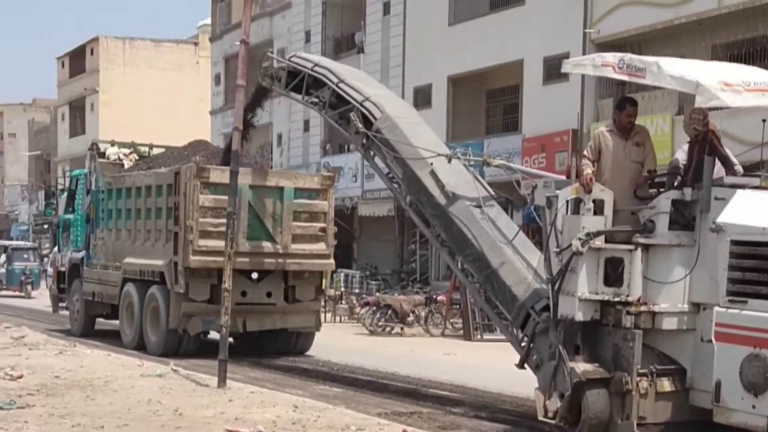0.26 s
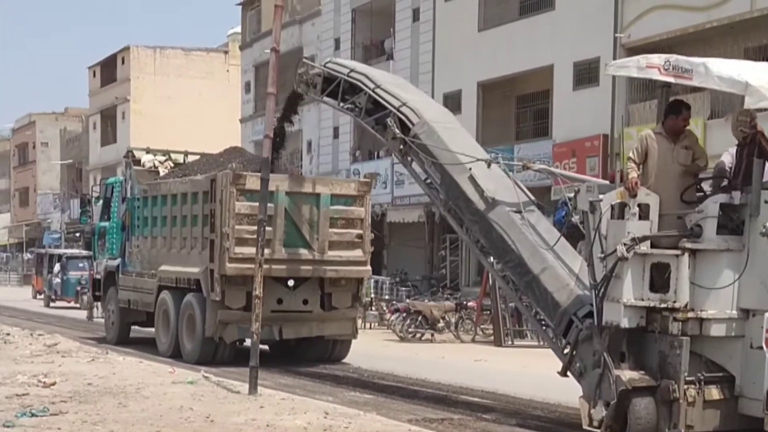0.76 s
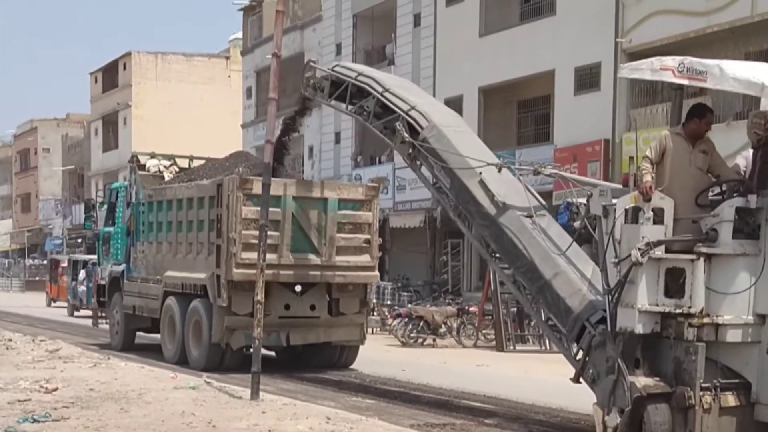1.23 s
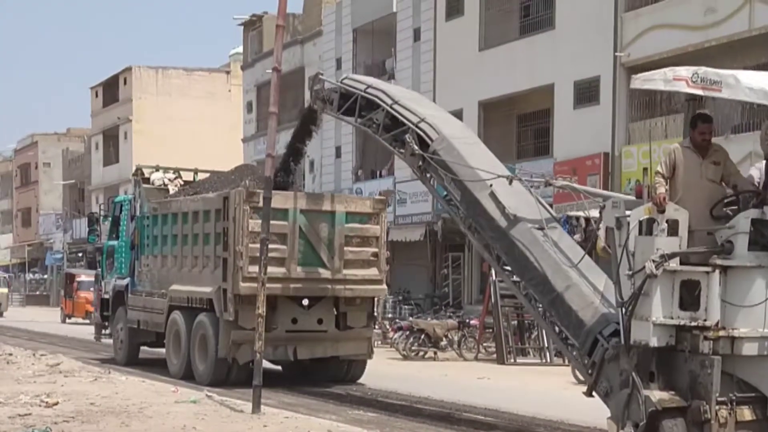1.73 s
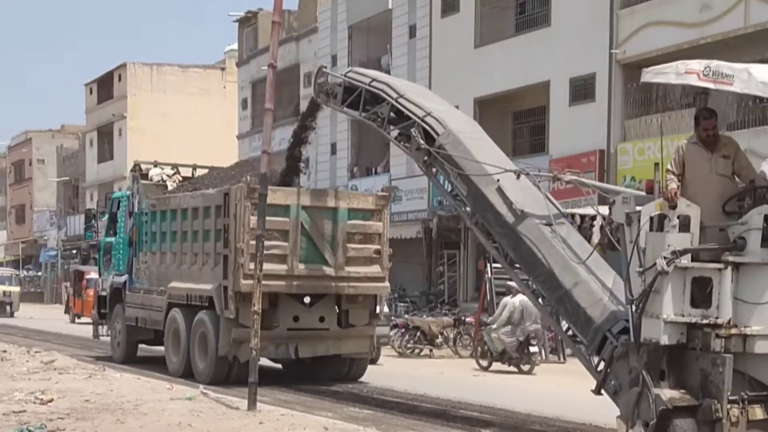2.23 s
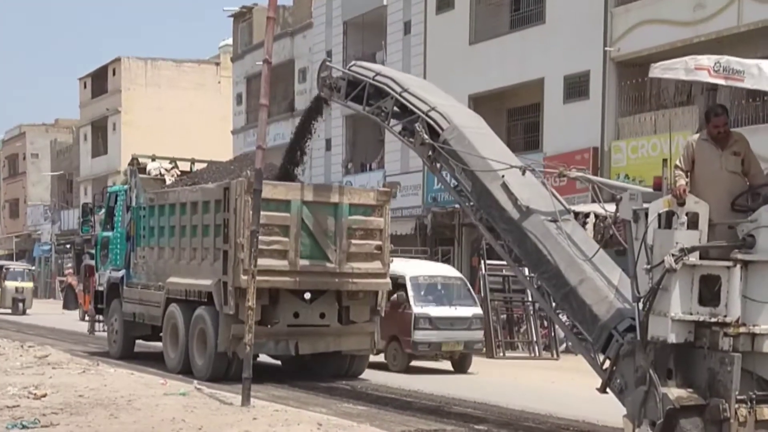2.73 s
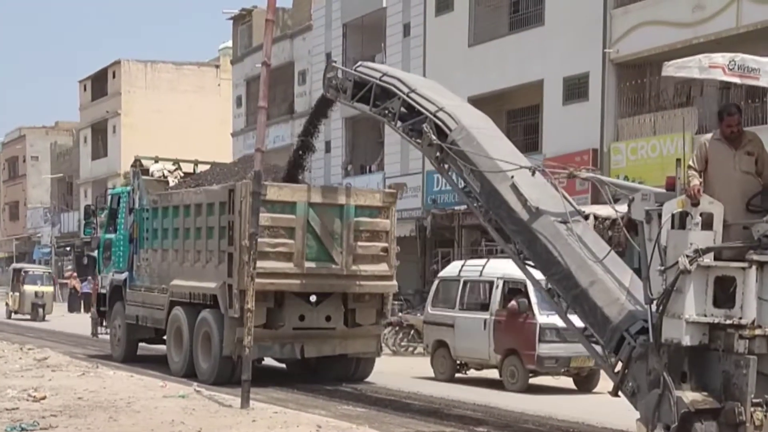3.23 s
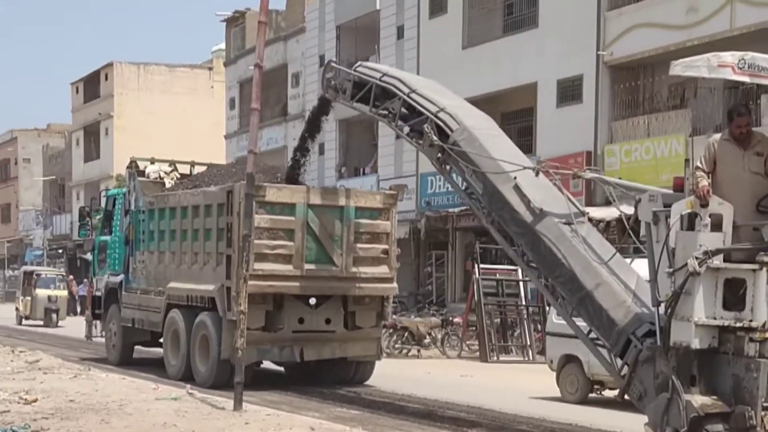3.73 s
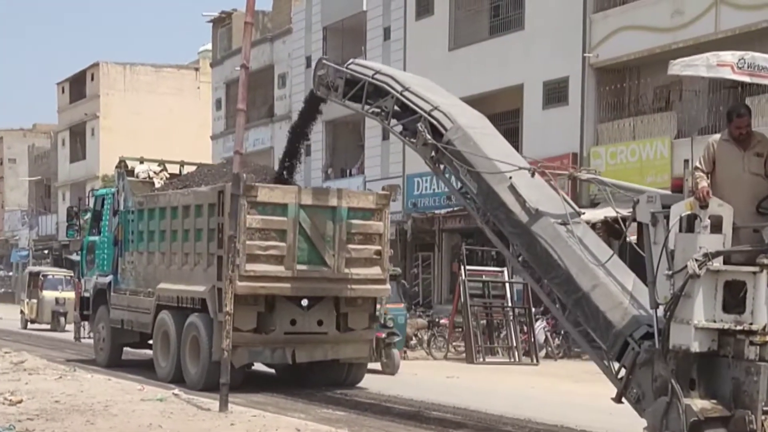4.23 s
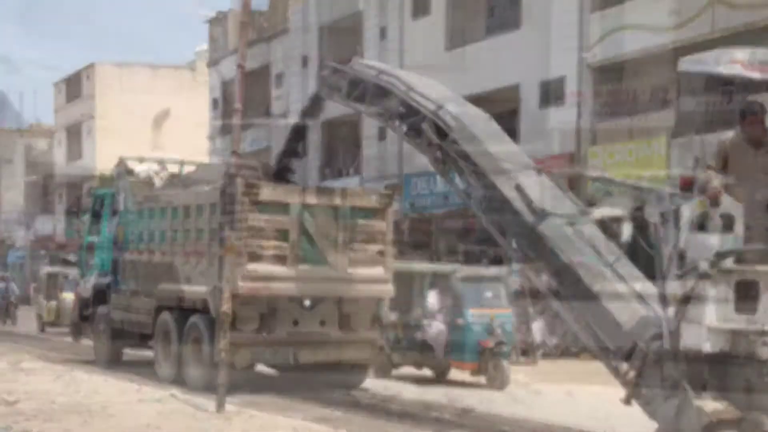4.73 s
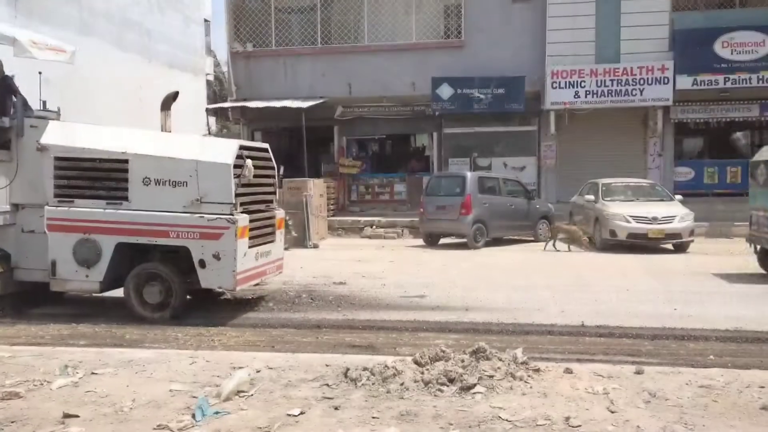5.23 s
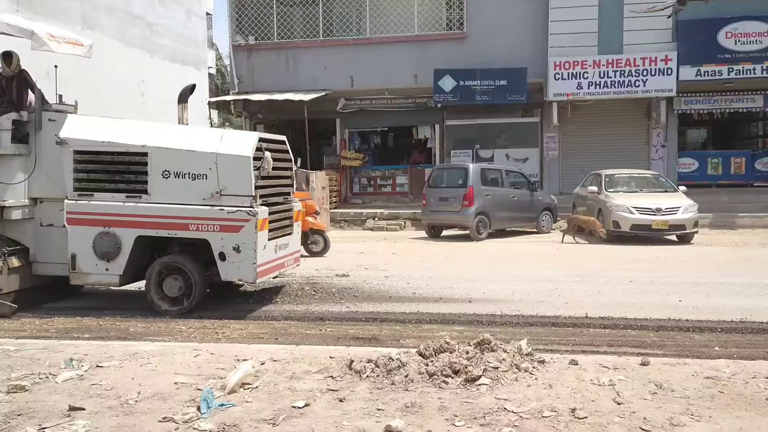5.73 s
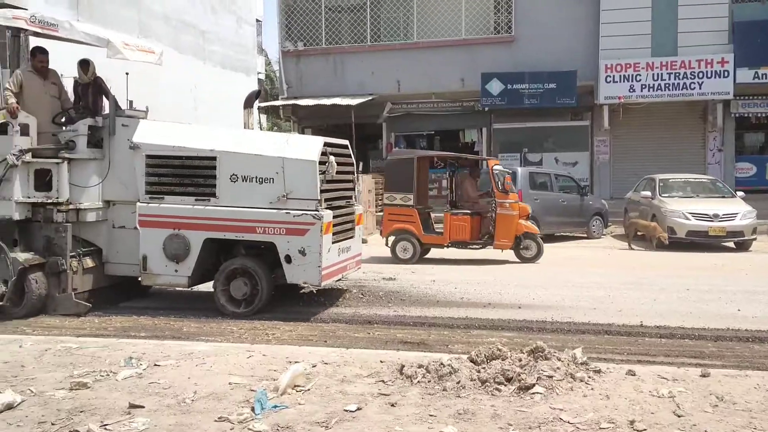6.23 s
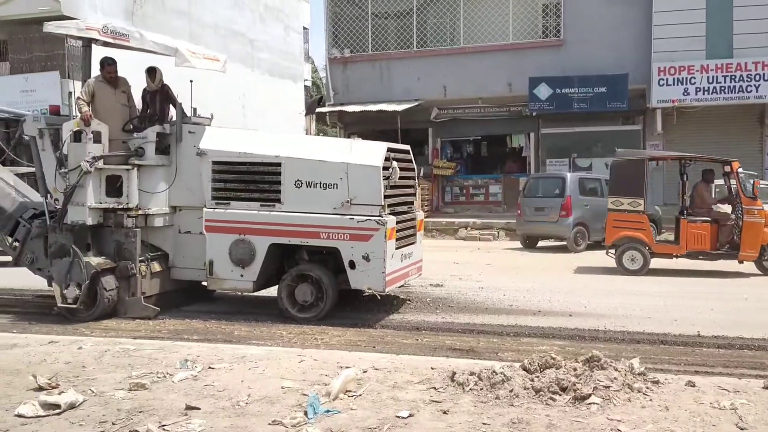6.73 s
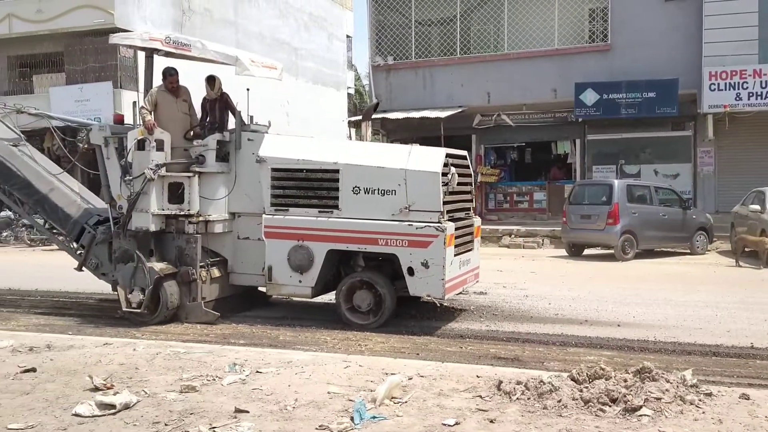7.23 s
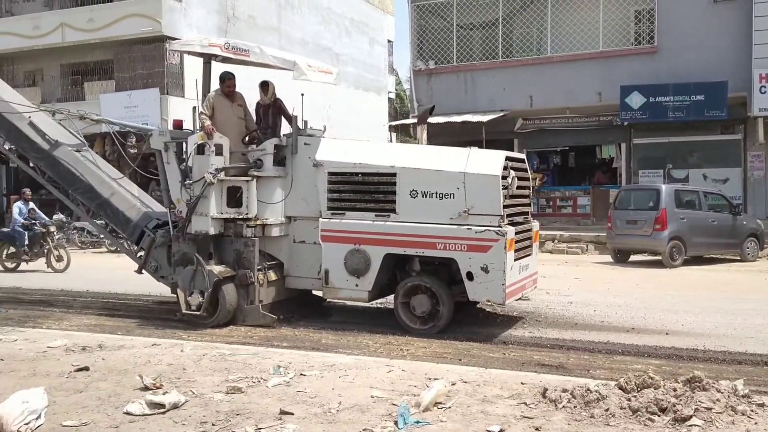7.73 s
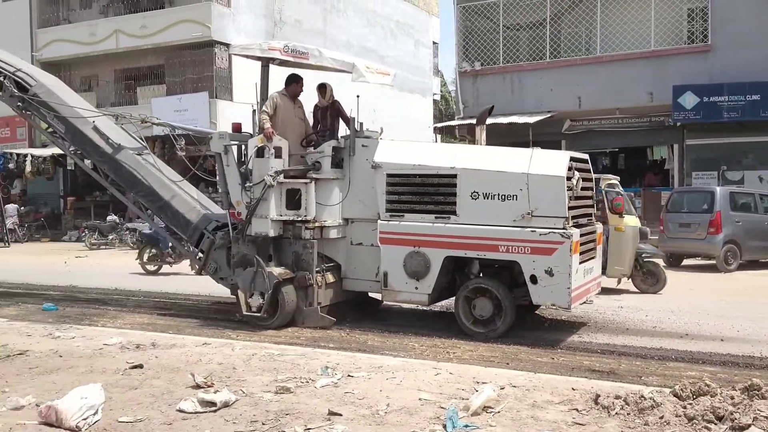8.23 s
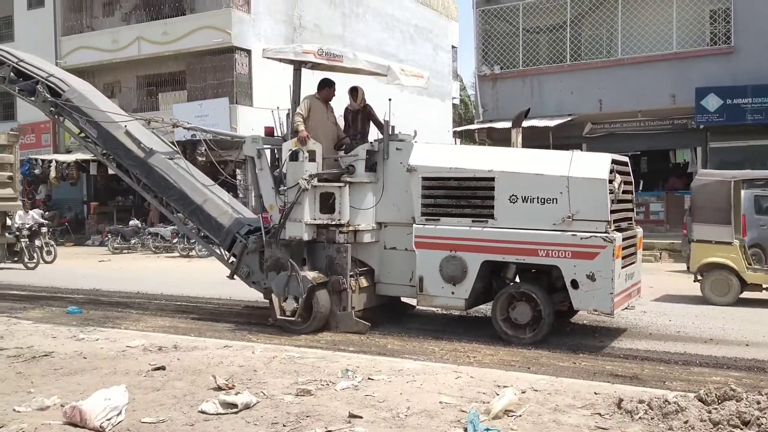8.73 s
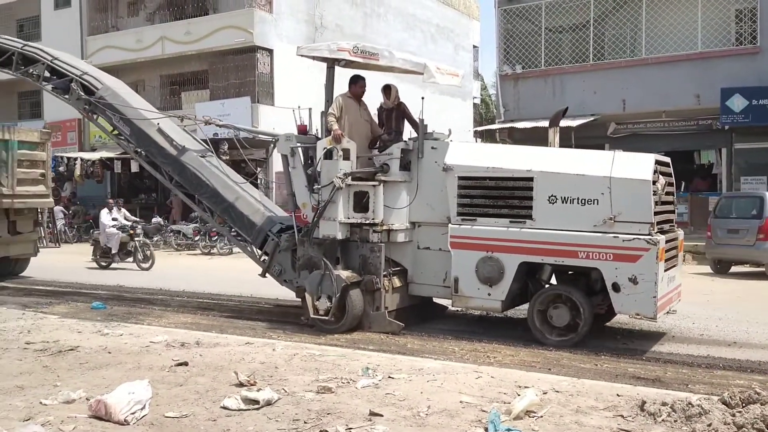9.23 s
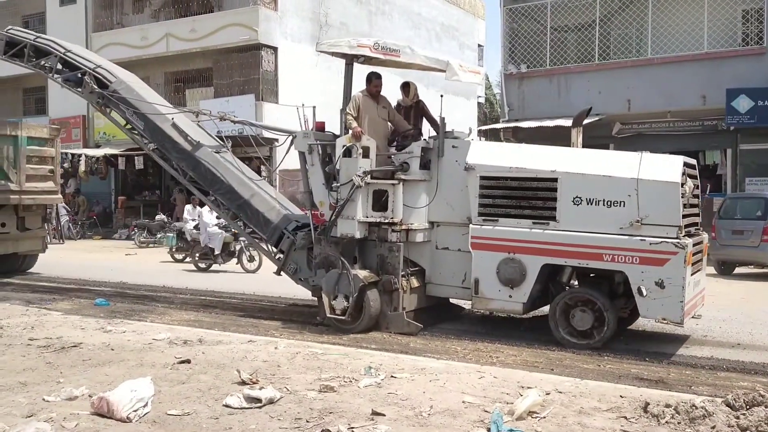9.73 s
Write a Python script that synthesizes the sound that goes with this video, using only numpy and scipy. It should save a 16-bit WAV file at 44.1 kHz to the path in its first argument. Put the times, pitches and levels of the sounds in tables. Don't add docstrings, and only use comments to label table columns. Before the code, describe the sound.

A road milling machine's heavy diesel drones and rumbles along a street, with early air hisses, a louder rushing fan midway and tinkling loose metal.

```python
import sys
import numpy as np
from scipy import signal
from scipy.fft import irfft
from scipy.io import wavfile
from scipy.ndimage import uniform_filter1d

SR = 44100
rng = np.random.default_rng(int(sys.argv[2]) if len(sys.argv) > 2 else 0)


def int16_out(signal):
    q = np.round(np.clip(np.atleast_2d(signal).T, -1, 1) * 32767)
    wavfile.write(sys.argv[1], SR, q.astype(np.int16))


def undo_db(level):
    steps = np.asarray(level, float) / 20
    return 10 ** steps


N = 439677
HOP = 1024
FRAME_S = HOP / SR
HZ = np.arange(1, HOP + 2) * SR / (2 * HOP)
FRAMES = np.arange(N // HOP + 2) * FRAME_S
TIME = np.arange(N) / SR
EDGE_HZ = 13150


def curve(table, t):
    s, *columns = np.transpose(table)
    return [np.interp(t, s, c) for c in columns]


def bumps(rows, t):
    return sum(db * np.exp(-((t - s) / half_s) ** 2) for s, db, half_s in rows)


def smooth(v, k):
    v = uniform_filter1d(uniform_filter1d(v, k), k)
    return v / v.std()


def walk(rate_hz, size, step_s):
    k = max(int(1 / (rate_hz * step_s)), 1)
    return smooth(rng.standard_normal(size), k)


def band(lo_hz, hi_hz, steep):
    return -10 * np.log10((1 + (lo_hz / HZ) ** steep) * (1 + (HZ / hi_hz) ** steep))


# (start [s], end [s])
TO_GRILLE, TO_FLANK = (4.46, 5.09), (6.55, 7.6)


def standpoints(t):
    arrive = np.interp(t, TO_GRILLE, (0, 1))
    leave = np.interp(t, TO_FLANK, (0, 1))
    return 1 - arrive, arrive * (1 - leave), leave


# (time [s], nearness [dB], fan and grit in view [dB])
PASS = [(0, -1, 3.5), (.7, -.5, 1), (1.6, 0.5, 3.5), (2.4, 0, 2.5), (3.05, 1, 3), (4.3, 0.5, -1),
        (4.68, -1.5, -0.5), (4.87, -1, 9.5), (5.1, 4.5, 17), (5.45, 6.5, 19.5), (6.4, 7, 18),
        (6.9, 5, 12.5), (7.2, 2.5, 10), (7.5, 0.5, 5), (8.4, 1, 6), (9.2, 0.5, 8), (9.97, 1.5, 5.5)]


def passing(t):
    return curve(PASS, t)


# (time [s], firing rate [Hz])
SPEED = [(0, 113.4), (1.2, 113), (2.2, 113.6), (2.9, 113), (3.4, 113.9), (4.5, 113), (5.0, 113.2),
         (7.2, 112.9), (7.8, 114.6), (8.4, 112), (8.8, 114), (9.15, 112), (9.97, 114)]


def engine_cycle():
    firing_hz = np.interp(TIME, *np.transpose(SPEED))
    return 2 * np.pi * np.cumsum(firing_hz / 6) / SR


FIRING_DB, FIRING_GAIN = -25.5, 1.12
BITE_S, SLACK_DB = 0.029, -8
# (multiple of cycle rate [1], level under firing at belt [dB], grille [dB], flank [dB])
TONES = [(2, -34, -45, -42), (4, -16, -20, -20), (6.75, -40, -13, -26), (9, -13, -10, -17),
         (10, -28, -22, -18), (11.4, -15, -13, -10), (12, -13, -15, -16), (13, -40, -22, -30),
         (16, -28, -24, -26), (20, -40, -27, -40), (22.8, -23, -28, -24), (29, -44, -27, -40),
         (30, -21, -32, -24), (36, -27, -26, -35), (39, -39, -27, -44), (44, -27, -26, -32),
         (46.4, -27, -23, -26), (50, -29, -37, -34), (59.2, -40, -30, -40), (92.5, -28, -38, -30),
         (88.3, -23, -34, -30)]
# (time [s], change [dB])
BITES = [(.78, 3), (1.3, -5), (1.44, 3), (2.08, -6), (3.64, -2), (3.7, 2), (4.22, -0.5), (4.94, -0.5),
         (7.2, -3), (7.53, 2), (8.47, 2.5), (9.02, -8), (9.64, -4)]
# (multiple [1], time [s], change [dB], half length [s])
SWELLS = [(9, 7.15, 7, .45), (9, 8.3, -6, .45), (9, 9.3, 3, .4), (9, 1, -4, .8), (11.4, 3.1, 5, .3),
          (11.4, 1.2, -6, 1.1), (11.4, 7.8, 3, .4), (12, .6, 3, .6), (12, 1.4, -8, .2), (12, 2.0, 4, .3),
          (12, 2.6, -8, .2), (13, 3.0, 22, .15), (16, 9.5, 18, .12), (22.8, 1.6, 4, .3), (30, 9.45, 7, .45),
          (30, 3.7, 3, .4), (46.4, 7.2, 7, .25), (46.4, 6.2, 4, .2), (44, 9.7, 9, .3), (92.5, 9.8, 12, .3),
          (92.5, 4.7, 6, .2), (9, 5.15, 4, .2), (20, 5.3, 5, .25), (36, 1.6, 5, .4)]
# (time [s], rise [dB], half length [s])
GRIPS = [
    (.05, 16, .12),
    (.45, 17, 0.2),
    (1.2, 0, .2),
    (2.0, 14, 0.23),
    (2.55, 13, 0.13),
    (3.0, 9, 0.092),
    (3.55, 10, .1),
    (3.9, 15, 0.12),
    (7.6, 1, .35),
]


def diesel(cycle):
    shares = standpoints(TIME)
    tone_db = FIRING_DB + FIRING_GAIN * passing(TIME)[0]
    tone_db = tone_db + bumps([(*row, BITE_S) for row in BITES], TIME)
    out = undo_db(0.45 * walk(39, N, 1 / SR)) * np.sin(6 * cycle)
    for k, *dbs in TONES:
        size = np.sqrt(sum(share * undo_db(2 * db) for share, db in zip(shares, dbs)))
        if k == TONES[-1][0]:
            size = size * undo_db(SLACK_DB + bumps(GRIPS, TIME))
        size = size * undo_db(bumps([row[1:] for row in SWELLS if row[0] == k], TIME))
        waver = undo_db(0.74 * walk(7.6, N, 1 / SR))
        out += size * waver * np.sin(k * cycle + 0.92 * walk(2.97, N, 1 / SR))
    out *= np.sqrt(2) * undo_db(tone_db)
    return np.array([out * undo_db(0.97), np.roll(out, shift=5) * undo_db(0.23)])


def ports(colour, shape_db, level_db, lo_hz, hi_hz, share, flicker_db):
    hz, *columns = np.transpose(colour)
    db, pan_db, like, lead = (np.interp(np.log(HZ), np.log(hz), c) for c in columns)
    db = db + shape_db
    db -= 10 * np.log10(np.sum(undo_db(2 * db)[(HZ > lo_hz) & (HZ < hi_hz)]))

    third = 3 * np.log2(HZ)
    flicker = walk(9, (int(third.max()) + 2, len(FRAMES)), FRAME_S)
    flicker = flicker + 0.78 * walk(5, len(FRAMES), FRAME_S)
    low, part = third.astype(int), (third % 1)[:, None]
    flicker = (1 - part) * flicker[low] + part * flicker[low + 1]
    gain = undo_db(db + level_db[:, None] + flicker_db * flicker.T) * np.sqrt(share)[:, None]

    common, left, right = rng.standard_normal((3, *gain.shape, 2)) @ [1, 1j]
    like = np.clip(like, 0, 1)
    late = np.exp(-2j * np.pi * HZ * lead / SR)
    left = (np.sqrt(like) * common + np.sqrt(1 - like) * left) * undo_db(pan_db / 2)
    right = (np.sqrt(like) * common * late + np.sqrt(1 - like) * right) * undo_db(-pan_db / 2)

    window = np.sin(np.pi * (np.arange(2 * HOP) + .5) / (2 * HOP))
    grains = irfft(np.array([left, right]) * gain) * HOP * window
    return (grains[:, 1:, :HOP] + grains[:, :-1, HOP:]).reshape(2, -1)[:, :N]


TOP_FALL_DB = (-5, 4, -2)
# (centre [Hz], width [Hz], level at belt [dB], grille [dB], flank [dB])
BODY = [(494, 12, -1.5, -6.5, -1), (694, 150, 4, 3.5, 1.5), (900, 106, 3.5, 3.5, 6.5),
        (975, 27, 1, -2.5, -7.5), (1086, 33, 4, 4, 5.5), (1630, 86, -3, 4, -7.5), (2140, 37, 1.5, -6, -1),
        (2460, 14, -5, 4.5, -1), (2660, 50, 1.5, -2.5, 1.5), (2840, 41, 6, -4, -0.5),
        (4800, 210, 3.5, 0, 0), (5400, 250, 0, 0.5, 0), (6640, 380, 1, -4.5, -2.5), (7900, 590, 0, 2.5, 1),
        (9760, 130, 0, 3, 2)]


def body():
    top = np.outer(TOP_FALL_DB, 1 / (1 + (EDGE_HZ / HZ) ** 80))
    return top + sum(np.outer(dbs, 1 / (1 + ((HZ - hz) / width_hz) ** 2)) for hz, width_hz, *dbs in BODY)


# (frequency [Hz], density [dB per Hz], left minus right [dB],
# likeness [0-1], left lead [samples])
BELT = [(30, -66, .4, .84, 2), (55, -70, .4, .85, 2), (76, -53, .4, .96, 2), (129, -48.5, .5, .975, 2),
        (231, -51.5, 0, .97, 1), (422, -61, 1, .87, 3), (905, -65.5, 1, .82, 3), (1490, -66.5, 1, .45, 4.5),
        (2330, -72, 2.5, .5, 1), (3000, -74, 3, .45, 3), (4000, -78, 4, .15, 3), (5640, -80, 1, .1, 2),
        (8000, -71.5, -3, .03, 2), (10400, -74.5, 6, .04, 2), (13500, -84.5, 1, .01, 3)]
GRILLE = [(35, -61, .3, .88, 2), (57, -60, .5, .88, 2), (78, -47, .5, .96, 2), (129, -40.5, .5, .975, 2),
          (233, -44, 0, .97, 6.2), (430, -52.5, .5, .75, 11), (900, -58, .6, .68, 8),
          (1250, -56, -1, .68, 13), (1480, -57, -.5, .8, 13.9), (1600, -58, -.5, .88, 14),
          (1850, -59, -1, .55, 14.5), (2500, -63, -2, .36, 17.5), (5600, -62, -3.4, .2, 22.6),
          (8400, -60, -2.5, .04, 20), (10300, -62.5, 12, .09, 19), (14000, -76, 6, .11, 22)]
FLANK = [(30, -66, .4, .84, 2), (55, -70, .4, .85, 2), (76, -54, .4, .96, 2), (130, -49, .5, .975, 2),
         (231, -51.5, .4, .99, 2.4), (430, -58.5, 0, .8, 2.5), (900, -60, 0, .7, 4.6),
         (1460, -61, -1.1, .6, 10), (2150, -66, -2, .35, 8.5), (2700, -69, 0, .35, 21),
         (3400, -73, 1, .25, 22), (5800, -74.5, -.5, .1, 23), (8300, -69.5, -3, .07, 21.6),
         (10600, -77, 15, .1, 22), (13800, -90, 12, .04, 22)]


def machine(shape_db, level_db, lo_hz, hi_hz, flicker_db):
    views = zip((BELT, GRILLE, FLANK), body(), standpoints(FRAMES))
    return sum(ports(colour, shape_db + body_db, level_db, lo_hz, hi_hz, share, flicker_db)
               for colour, body_db, share in views)


def lurch():
    return .6 * walk(6, len(FRAMES), FRAME_S)


def rumble():
    level_db = -29.5 + 0.84 * passing(FRAMES)[0] + lurch()
    return machine(band(18, 364, 6.3), level_db - .7, 130, 350, 0.5)


def roar(cycle):
    level_db = -32 + passing(FRAMES)[0] + .5 * lurch()
    noise = machine(band(344, 2190, 7.5), level_db + 0.5, 350, 1970, 1.0)
    return undo_db(0.12 * np.cos(6 * cycle)) * noise


RUSH_DB, DULLING = -47, 0.3
BRIGHT_DB = (5.5, 2, 2)


def rush(cycle):
    view_db = passing(FRAMES)[1]
    db = RUSH_DB + view_db + 0.41 * walk(4, len(FRAMES), FRAME_S)
    bright_db = np.dot(BRIGHT_DB, standpoints(FRAMES)) - DULLING * view_db
    knock_db = .25 * np.cos(6 * cycle)
    chop = undo_db(knock_db + 0.75 * walk(260, N, 1 / SR) + 0.48 * walk(44, N, 1 / SR))
    low = machine(band(1680, 5900, 5.1), db + 2.5, 2590, 7100, 1.0)
    high_shape_db = band(4000, 30000, 3.8) + band(1, 14400, 24.0)
    high = machine(high_shape_db, db + bright_db - 2, 5800, 11800, 0.67)
    return chop * low + chop ** 1.1 * high


WHINE_DB = (-43.5, -42.5, -44.5)
PUMP_TOP_LEAD = (.5, 16.6, 16.6)
# (centre [Hz], width [Hz], level at belt [dB], grille [dB], flank [dB])
PUMP = [(1690, 18, -8, -8, -9), (1755, 32, 0, 0, 0), (1830, 45, -5, -5, -10), (1910, 45, -10, -12, -10),
        (2180, 45, -8, -14, -13), (2660, 40, -8, -9, -19)]
# (left minus right [dB], likeness [0-1], left lead [samples])
PUMP_SPOT = [(5.5, 0.86, 2.9), (2, 0.97, 15.8), (5, 0.84, 7.1)]
# (time [s], rise [dB], half length [s])
SURGES = [
    (2.3, 6.1, 0.092),
    (4.2, 1.7, 0.22),
    (6.2, 6.9, 0.49),
    (12, 4.8, 0.11),
    (8.7, 4.8, 0.2),
    (9.3, 12, 0.11),
    (9.9, 12, 0.27),
    (9.6, 5.5, 0.15),
    (5, 2, 0.23),
]


def whine():
    db = np.dot(WHINE_DB, standpoints(FRAMES)) + bumps(SURGES, FRAMES)
    power = sum(np.outer(undo_db(2 * np.array(dbs)), 1 / (1 + ((HZ - hz) / width_hz) ** 6))
                for hz, width_hz, *dbs in PUMP)
    shapes_db = 10 * np.log10(power)
    spots = ([(2300, 0, *spot), (2500, 0, *spot[:2], lead)] for spot, lead in zip(PUMP_SPOT, PUMP_TOP_LEAD))
    tones = sum(ports(spot, shape_db, db + .5, 1650, 1820, share, 1.0)
                for spot, shape_db, share in zip(spots, shapes_db, standpoints(FRAMES)))
    return undo_db(1.7 * walk(49, N, 1 / SR)) * tones


def rings(events, t60_s, attack_s, rough, grain_s=0.0017, late=20):
    out, t = np.zeros((2, N + SR)), np.arange(SR // 8) / SR
    chance = rng.standard_normal((len(events), len(t)))
    for (s, db, hz, pan_db), c in zip(events, chance):
        shape = (1 - np.exp(-(t / attack_s) ** 2)) * 1000. ** (-t / t60_s)
        shape = shape * (1 + rough * smooth(c, int(grain_s * SR)))
        for side, lag in ((0, 0), (1, late)):
            at = int((s - attack_s) * SR) + lag
            out[side, at:at + len(t)] += undo_db(db + pan_db * (1 - side)) * shape * np.sin(2 * np.pi * hz * t)
    return out[:, :N]


TINK_HZ, TINK_SPREAD_HZ, TINK_PAN_DB = 9860, 60, 13.5
REBOUND_S = (0, .044, .08, .119)
# (time [s], kick [dB], first, second, third rebound [dB])
KICKS = [(1.185, -34, -45, -50, -59), (2.232, -43, -49, -56, -50), (2.761, -42, -51, -54, -57),
         (4.323, -39, -48, -50, -50), (4.756, -43, -36, -36, -42), (5.283, -25, -27, -25, -40),
         (5.809, -25, -29, -33, -31), (6.33, -28, -18.5, -26, -27.5), (6.854, -39, -43, -35, -34),
         (7.382, -34, -42, -50, -50), (8.427, -23.5, -45, -31, -50), (8.945, -28, -45, -32, -50),
         (9.476, -33, -45, -50, -50)]
# (time [s], peak [dB])
STRAYS = [(1.401, -38), (2.452, -37), (2.549, -45), (3.149, -36), (3.57, -43), (4.556, -35), (4.983, -35),
          (5.583, -30), (6.032, -35), (6.67, -27), (6.746, -28), (7.534, -38), (7.581, -41), (8.239, -34),
          (8.616, -29), (8.656, -34)]


def tinks():
    hits = [(s + late_s, db) for s, *dbs in KICKS for late_s, db in zip(REBOUND_S, dbs)]
    hits += list(STRAYS)
    chance = rng.standard_normal(len(hits))
    return [(s, db, TINK_HZ + TINK_SPREAD_HZ * c, TINK_PAN_DB) for (s, db), c in zip(hits, chance)]


# (time [s], peak [dB], ring [Hz], left minus right [dB])
PINGS = [
    (8.449, -25, 7500, -1),
    (8.465, -20, 7750, -1),
    (8.455, -24, 3950, 0),
    (8.472, -28, 3300, 0),
]


def metal():
    out = undo_db(3.5) * rings(tinks(), .045, .005, .4, grain_s=.003)
    out += undo_db(-11) * np.roll(out, int(.021 * SR), axis=1)
    return out + rings(PINGS, .055, .005, .5, late=11)


BURST_RISE_S, BURST_STEP_DB = .11, 12.5
# (start [s], hold [s], body level [dB], jet top level [dB])
BURSTS = [
    (1.4, 0.11, -30, -44),
    (1.64, 0.07, -33, -41),
    (2.736, 0.36, -40.5, -73),
    (3.35, 0.29, -43.5, -74),
    (3.753, 0.39, -44.5, -56),
]


def bursts(column, fall_db_s):
    power = 1e-12
    for row in BURSTS:
        age_s = FRAMES - row[0]
        rise_db = BURST_STEP_DB * np.minimum(age_s / BURST_RISE_S - 1, 0)
        fall_db = fall_db_s * np.maximum(age_s - BURST_RISE_S - row[1], 0)
        power = power + undo_db(2 * (row[column] + rise_db - fall_db))
    return 10 * np.log10(power)


# (frequency [Hz], density [dB per Hz], left minus right [dB], likeness [0-1],
# left lead [samples])
AIR = [(1440, -57, -1, 0.069, 34), (2300, -67.5, -10, 0.23, 3), (4040, -61.5, 4.5, 0.4, -3.5),
       (5350, -60, -1.5, .1, 6), (7000, -60, -7.5, 0.25, -1), (9000, -56.5, -1, .1, 4),
       (10700, -66, 0, .04, -4), (12100, -71, -3, .02, -13), (13500, -76, -8, .02, 0),
       (15800, -79.5, -8, .05, 4)]
# (time [s], peak [dB], ring [Hz])
SPUTTERS = [
    (1.552, -27, 7600),
    (1.733, -24, 7350),
    (1.735, -30, 15300),
    (1.775, -26, 6700),
    (1.792, -25, 6750),
    (1.884, -27, 6500),
    (1.942, -28, 14800),
    (2.0, -33, 14500),
]


def air():
    db = bursts(column=2, fall_db_s=32.5)
    top_db = bursts(column=3, fall_db_s=22)
    spit = undo_db(1.3 * walk(35, N, 1 / SR) + 1.4 * walk(400, N, 1 / SR))
    whole = np.ones(len(FRAMES))
    jet = ports(AIR, band(960, 12000, 2.8), db + 4, 4000, 12000, whole, .8)
    top = ports(AIR, band(16000, 30000, 9.4), top_db, 13200, 16000, whole, .8)
    sputter = rings([(*row, -7) for row in SPUTTERS], .05, .004, 1.5, grain_s=.0004)
    return spit * (jet + top) + undo_db(5) * sputter


def scene():
    cycle = engine_cycle()
    return diesel(cycle) + rumble() + roar(cycle) + rush(cycle) + whine() + metal() + air()


STARVE_DB, STARVE_DB_KHZ, STARVE_SPREAD_DB, BURIED_DB = -76, 3, 8, -12
# (time [s], rise [dB], half length [s])
LEAN_SPELL = [
    (7.1, 10, .4),
    (5.4, 8, .5),
    (8.9, -7, 1.),
    (.6, -3, .5),
]
# (time [s], rise [dB], half length [s])
HOLLOW_SPELL = [
    (5.9, 4.5, .42),
    (6.7, 4, .14),
]


def starve(x):
    hz, t, z = signal.stft([x[0] + x[1], x[0] - x[1]], SR, "cosine", HOP)
    power = uniform_filter1d(abs(z) ** 2, size=3, axis=2)
    narrow = uniform_filter1d(power, size=3, axis=1)
    z[0] *= narrow[0] > narrow[1] * undo_db(2 * (BURIED_DB + bumps(HOLLOW_SPELL, t)))

    row, col = np.arange(len(hz)) // 8, np.arange(z.shape[2]) // 3
    patch = rng.standard_normal((row[-1] + 1, col[-1] + 1))
    whole = rng.standard_normal(col[-1] + 1)
    level_db = 10 * np.log10(2 * uniform_filter1d(power.mean(0), size=8, axis=0) + 1e-18)
    level_db = uniform_filter1d(level_db, size=9, axis=1)
    level_db = level_db + STARVE_SPREAD_DB * (.9 * patch + .45 * whole)[row][:, col]
    floor_db = STARVE_DB + STARVE_DB_KHZ * (hz[:, None] - EDGE_HZ) / 1000 + bumps(LEAN_SPELL, t)
    z *= (level_db > floor_db) | (hz < EDGE_HZ)[:, None]
    mid, side = signal.istft(z, SR, "cosine", HOP)[1][:, :N]
    return np.array([mid + side, mid - side]) / 2


def roll_off(x):
    return signal.sosfilt(signal.butter(12, 15900, fs=SR, output="sos"), x)


def record(dry):
    thin = signal.sosfilt(signal.butter(2, 42, "high", fs=SR, output="sos"), dry)
    cut = signal.sosfilt(signal.ellip(10, .3, 70, 15760, fs=SR, output="sos"), thin)
    mix = starve(cut)
    return roll_off(mix)


dry = scene()
out = record(dry)
int16_out(out)
```